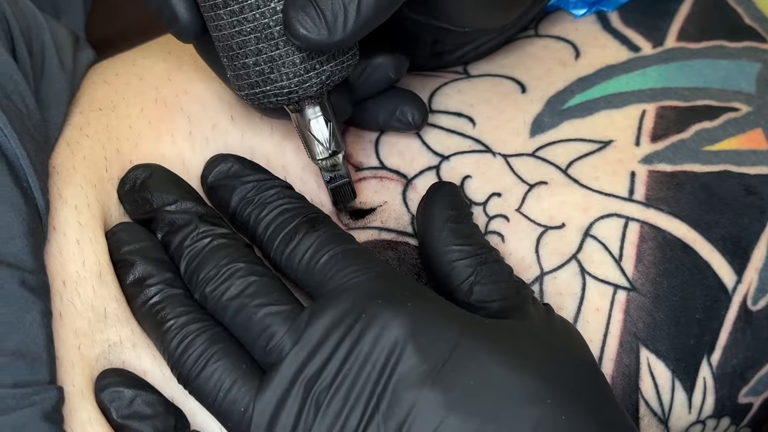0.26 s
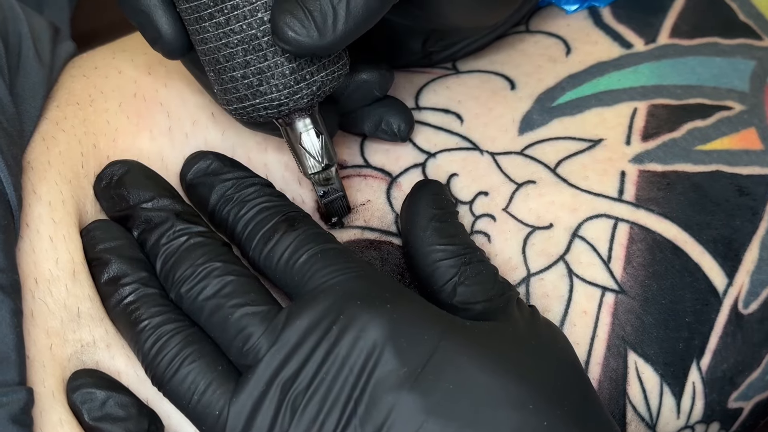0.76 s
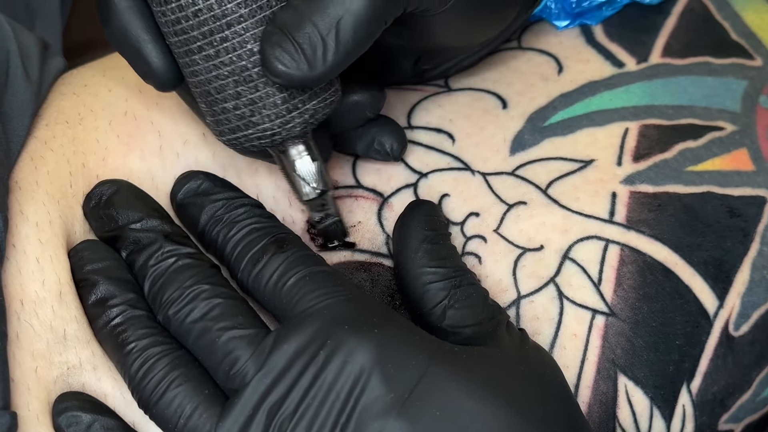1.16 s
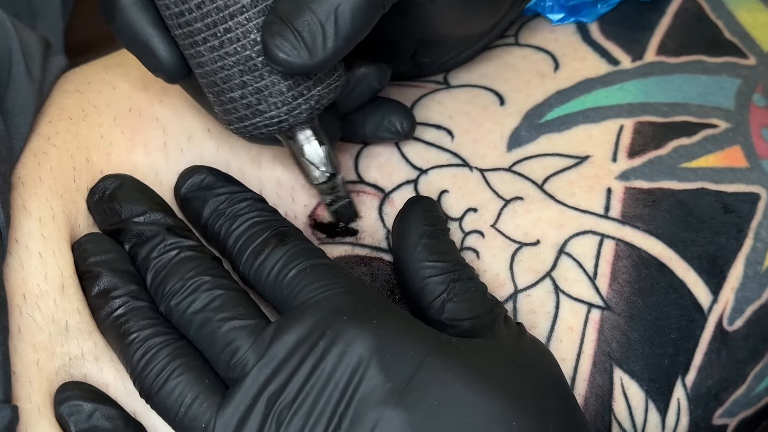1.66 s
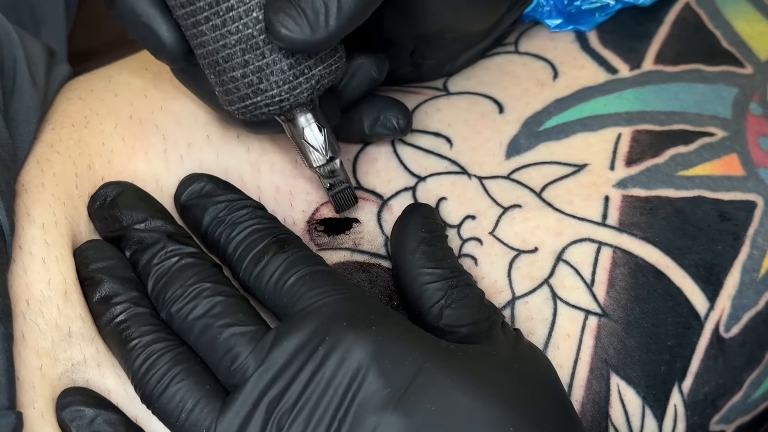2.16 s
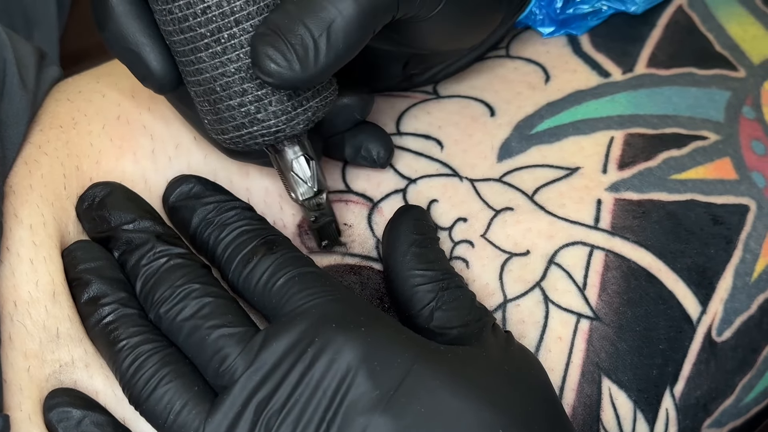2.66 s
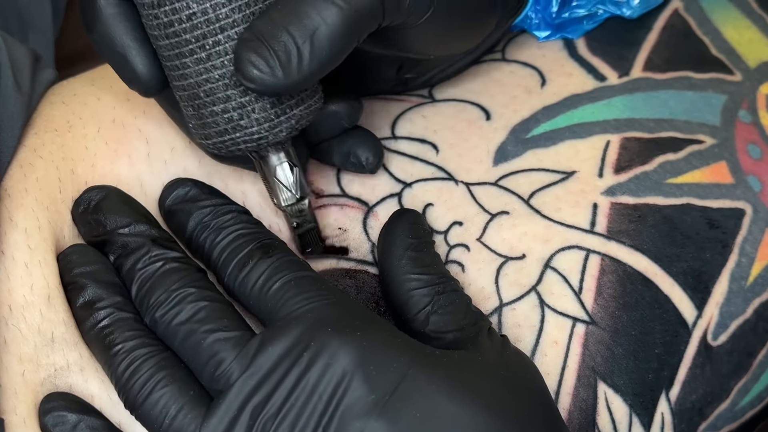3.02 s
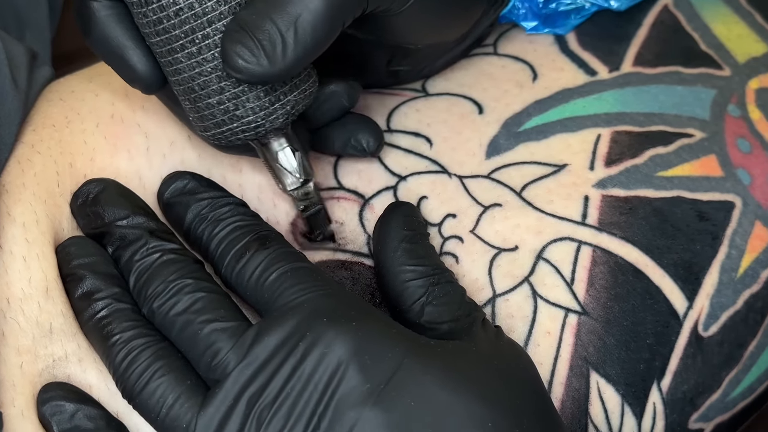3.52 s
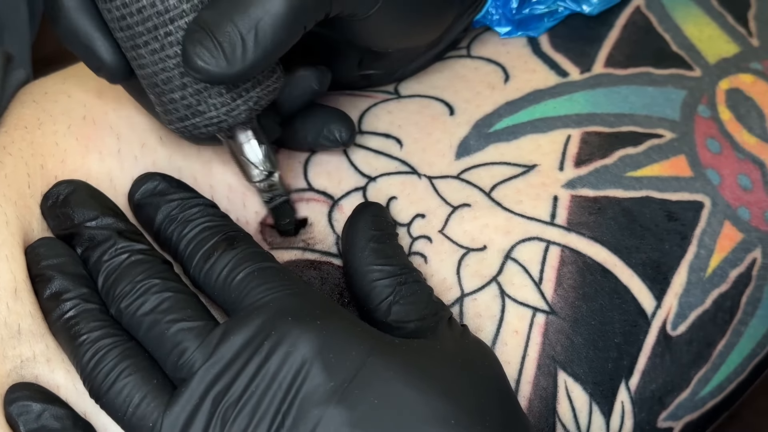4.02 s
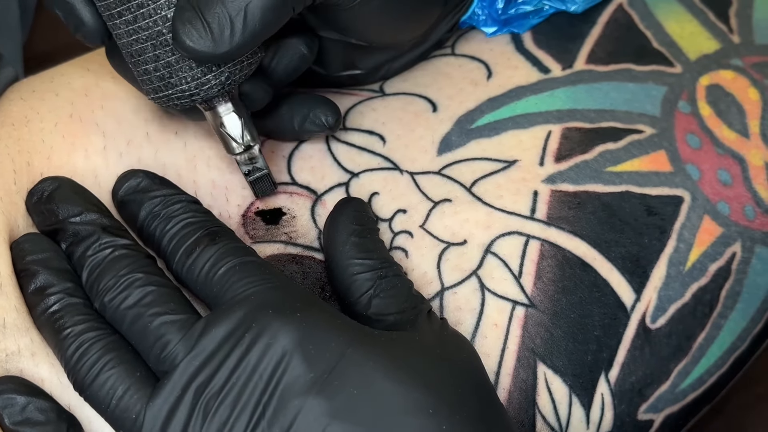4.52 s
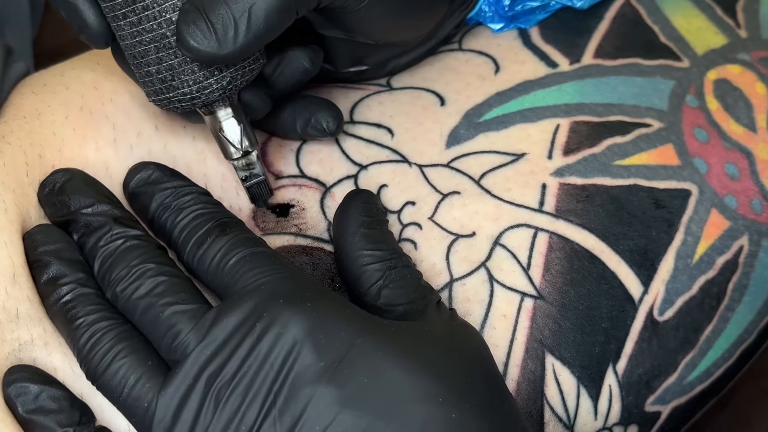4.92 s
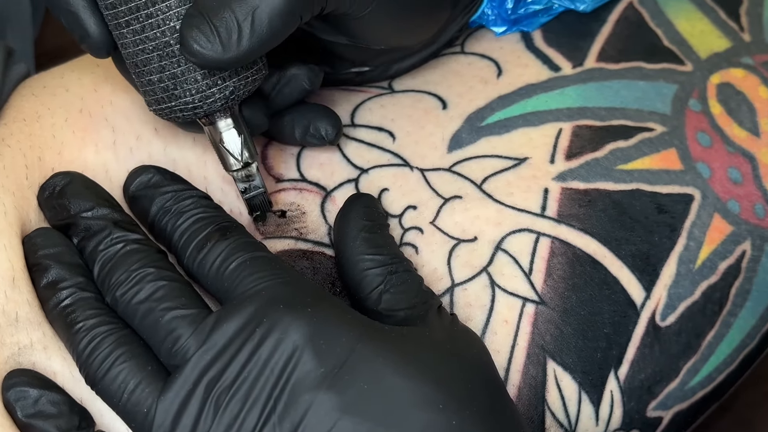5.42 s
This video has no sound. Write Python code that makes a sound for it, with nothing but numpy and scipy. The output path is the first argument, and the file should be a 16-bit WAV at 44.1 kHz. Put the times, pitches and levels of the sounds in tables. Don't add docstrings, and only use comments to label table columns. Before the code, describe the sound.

Close, thin electric buzzing of a tattoo pen, rattly and even, with two brief lifts where the motor runs slightly faster.

```python
import sys
import numpy as np
from scipy import signal
from scipy.fft import rfft, irfft, next_fast_len
from scipy.io import wavfile
from scipy.ndimage import uniform_filter1d, map_coordinates

SR = 44100
rng = np.random.default_rng(int(sys.argv[2]) if len(sys.argv) > 2 else 0)


def field_ratio(decibels):
    return 10 ** (np.asarray(decibels, dtype=float) / 20)


def file_out(sig):
    cols = np.atleast_2d(sig).T
    lim = np.clip(cols, -1, 1)
    pcm = np.round(lim * 32767).astype(np.int16)
    wavfile.write(sys.argv[1], SR, pcm)


N = 250564

# hz, level_db per Hz
RUMBLE_COLOUR = [(25, -12), (45, -2.5), (100, -2), (190, 3), (320, -2), (450, -6.5), (900, -3.5),
                 (2000, -24)]
# hz, left_right_difference_db
RUMBLE_WIDTH = [(30, -27), (80, -36), (150, -52), (300, -5.5), (2000, -3.5)]
# hz, level_db (rms)
FAN_LINES = [
    (88.5, -58),
    (110, -78),
    (165, -68.5),
    (220, -70.5),
]
# start_s, peak_db
GRIP_TICKS = [
    (1.1694, -45),
    (1.9394, -44),
    (2.5935, -37),
    (2.9716, -36),
]
# pitch_hz, level_db (rms)
SUPPLY_WHISTLES = [
    (5975, -55),
    (5708, -59),
]

# down_s, up_s, touch_down_slowing_hz, further_slowing_hz_per_s
SKIN_PASSES = [
    (-.2, 2.081, .71, .85),
    (2.444, 4.155, 1.71, .58),
    (4.603, 5.9, 1.26, .52),
]
PASS_BUZZ = (0, -0.3, 2.2)
PASS_DEPTH = (1, 1, .4)
# centre_s, slowing_hz
CIRCLING_STROKES = [(0.07, 0.51), (0.24, 1.14), (0.46, 0.71), (0.71, 0.76), (0.89, 0.42), (1.06, 0.94),
                    (1.25, 1.06), (1.45, 1.16), (1.64, 0.83), (1.84, 0.92), (2.04, 1.11), (2.33, 0.2),
                    (2.48, 0.41), (2.67, 0.73), (2.9, 1.11), (3.1, 1.11), (3.33, 0.98), (3.53, 1.0),
                    (3.74, 1.09), (3.97, 1.18), (4.6, 0.33), (4.85, 0.48), (5.01, 0.43), (5.28, 0.38),
                    (5.55, 0.27)]
# time_s, level_db
GRIP_FREEDOM = [
    (0, -2),
    (.9, 0),
    (2.9, -0.3),
    (3.3, -1.8),
    (4.04, -1.5),
    (4.13, 2.5),
    (4.24, -1.5),
    (5.12, -4.5),
    (5.68, -1.5),
]

# speed_multiple, level_db
SKIN_TONES = [(1, -3), (2, -4), (3, -6), (4, -19), (5, -19), (6, -18), (7, -14), (8, -11), (9, -1),
              (10, -5.5), (11, -7), (12, -19), (13, -20), (14, -16), (15, -5), (16, -14), (17, -3),
              (18, -9), (19, -6), (20, 8.5), (21, 1), (22, -3.5), (23, -4), (24, -5), (25, -7), (26, -9),
              (27, -4), (28, -8), (29, -2), (30, -11), (31, -3), (32, -12)]
# speed_multiple, level_db
AIR_TONES = [(1, -8), (2, -6), (3, -8), (4, -16), (5, -16), (6, -15), (7, -17), (8, -10), (9, -5.5),
             (10, -11), (11, -9), (12, -18), (13, -14), (14, -15), (15, -7), (16, -12), (17, -1), (18, -15),
             (19, -13), (20, -4), (21, -6), (22, -1.5), (23, 2.5), (24, -8), (25, -17), (26, -6), (27, -12),
             (28, -11), (29, -4), (30, -8), (31, -8.5), (32, -16)]
# place (turns, 0-1), length (turns), pitch_hz, width_hz, skin_level_db, air_level_db
HOUSING_KNOCKS = [(.95, 0.051, 3170, 440, -44.3, -49), (.25, 0.2, 3680, 600, -62, -46.5),
                  (.42, 0.17, 5870, 770, -47.5, -46), (0.08, 0.069, 5230, 560, -45, -47),
                  (0.7, 0.053, 8100, 510, -63, -49.5), (.57, .07, 9130, 470, -52, -47.5),
                  (0, 0.17, 10700, 2700, -55.5, -52), (.6, .25, 4080, 500, -64, -44.5),
                  (0.05, 0.11, 14400, 1300, -62, -57)]
# place (turns), length (turns), pitch_hz, width_hz, return_stroke_db
SHELL = (-0.5, 9, 4548, 416, -0.5)
# place (turns), length (turns), speed_multiple, width_hz
WHINE_BAND = (1.08, 0.098, 88.5, 440)
# hz, level_db per Hz
RATTLE_COLOUR = [(500, -14.5), (1000, -12.5), (1600, 5), (2500, 0.5), (3050, -1.5), (3600, -1.5), (5200, 2),
                 (6500, 3.5), (7600, 4), (8400, -2), (10500, 2.5), (12800, -3), (15500, -1.5), (17000, -1)]
# hz, left_lead_rad
PORT_LEAD = [(1150, .5), (1300, -.3), (1550, 2.1), (1850, .1), (2900, .9), (3300, .8), (3600, .05),
             (6100, .1), (6900, .9), (7450, 3.14), (8400, 6.28), (10500, 3.45), (11900, 2.75), (14100, .05)]
# hz, left_minus_right_db
PORT_LEVEL = [(400, -.4), (700, 1.8), (1200, 2), (1550, -7), (1900, -3), (2300, .1)]
# hz, level_db
SCATTERED = [(60, -26), (300, -16), (700, -13), (1400, -6), (3000, -12), (5000, -22), (8000, -14),
             (11000, -15), (14500, -16), (15700, -9)]

IDLE_HZ = 79
FREE_HZ, LOAD_DROP_HZ = 78.8, 1.4
LANDING_S, LIFT_S, STROKE_S = .026, .022, .047
TONES_DB, BUZZ_ORDERS = -51.5, (20, 31)
BUZZ_DB_PER_HZ, BUZZ_LEAD_S = 2, .06
STRAIN_ORDERS, STRAIN_DB = (22, 25), 4.5
STRAIN_FROM_HZ, STRAIN_FULL_HZ = 1.6, 2.0
RING_DB, RING_DB_PER_HZ, RING_LAG_S = -38.5, 1.8, .03
WHINE_DB, WHINE_DB_PER_HZ = -44, -5.5
WHINE_FOLLOWS_GRIP, WHINE_IN_AIR_DB = .33, 1.5
EARLY_WHINE_DB, WHINE_SETTLES_S, SETTLING_S = 7.5, 1.3, .3
RATTLE_DB, RATTLE_FOLLOWS_GRIP = -33, .075
BLOW_JITTER, BLOW_SCATTER_DB = .0005, 1.2
MOST_TURNS = 600


def rms_one(x):
    return x / np.sqrt(np.mean(x ** 2) + 1e-20)


def at_hz(points, hz):
    curve_hz, value = np.transpose(points)
    return np.interp(np.log(hz), np.log(curve_hz), value)


def drift(rate_hz):
    pole = np.exp(-80 * np.pi * rate_hz / SR)
    noise = rng.standard_normal(N // 40 + 2002)
    slow = signal.lfilter([1], [1, -2 * pole, pole * pole], noise)[2000:]
    return np.interp(np.arange(N) / 40, np.arange(len(slow)), rms_one(slow - slow.mean()))


def filtered(x, response):
    size = next_fast_len(N + 4096)
    hz = np.maximum(np.arange(size // 2 + 1) * SR / size, 1)
    return irfft(rfft(x, size) * response(hz), size)[..., :N]


def coloured(x, curve):
    return filtered(x, lambda hz: field_ratio(at_hz(curve, hz)))


def band(x, hz, width_hz):
    edges = [hz - width_hz / 2, hz + width_hz / 2]
    return rms_one(signal.sosfilt(signal.butter(2, edges, "band", fs=SR, output="sos"), x))


def once_a_turn(turns, place, length, depth_db, scatter_db):
    shifted = turns - place + .5
    strengths = field_ratio(scatter_db * rng.standard_normal(MOST_TURNS))
    strength = strengths[shifted.astype(int) + 1]
    swell = np.exp(-.5 * ((shifted % 1 - .5) / length) ** 2)
    return rms_one(1 + field_ratio(depth_db) * strength * swell)


def impacts(turns, place, jitter, scatter_db):
    timing, force = rng.standard_normal((2, MOST_TURNS))
    due = np.arange(MOST_TURNS) + place + jitter * timing
    inside = (due > 0) & (due < turns[-1])
    clicks = np.full(N, 1e-18)
    clicks[np.searchsorted(turns, due[inside])] = field_ratio(scatter_db * force[inside])
    return clicks


def struck(blows, gate, hz, width_hz, share):
    ring = band(blows, hz, width_hz)
    scrape = band(gate * rng.standard_normal(N), hz, width_hz)
    return np.sqrt(share) * ring + np.sqrt(1 - share) * scrape


def surface(turns):
    multiple = np.arange(281)
    spectrum = np.exp(2j * np.pi * rng.random(281)) * (multiple > len(SKIN_TONES))
    track = irfft(spectrum, 560)
    return rms_one(map_coordinates(track, [turns % 1 * 560], order=3, mode="grid-wrap"))


def blend(repeating, share):
    return np.sqrt(share) * repeating + np.sqrt(1 - share) * rng.standard_normal(N)


def studio():
    air = coloured(rng.standard_normal((2, N)), RUMBLE_COLOUR)
    middle, width = field_ratio(-51.5) * rms_one(air)
    width = coloured(width, RUMBLE_WIDTH)
    t = np.arange(N) / SR
    lines = np.zeros(N)
    for hz, level_db in FAN_LINES:
        level = field_ratio(level_db + 2.0 * drift(.63))
        lines += level * np.sin(2 * np.pi * hz * t + .66 * drift(2.8))
    return middle + np.sqrt(2) * lines + width * [[1], [-1]]


def ticks():
    clicks = np.zeros(N)
    decay = np.exp(-np.arange(200) / 30)
    for start_s, peak_db in GRIP_TICKS:
        start = round(start_s * SR)
        clicks[start:start + 200] = field_ratio(peak_db + 16) * rng.standard_normal(200) * decay
    return coloured(clicks, [(1500, -18), (5500, -11), (9000, -3), (12000, -3), (16000, -8)])


def whistles():
    t = np.arange(N) / SR
    lines = np.zeros(N)
    for hz, level_db in SUPPLY_WHISTLES:
        level = field_ratio(level_db + 2.4 * drift(1.5))
        lines += level * np.sin(2 * np.pi * hz * t + .6 * drift(5.9))
    fade_in = np.clip((t - 2.68) / .05, 0, 1)
    return np.sqrt(2) * fade_in * lines


def touching():
    t = np.arange(N) / SR
    contact, leaning_hz = [], np.zeros(N)
    for down_s, up_s, slow_hz, sag_hz_per_s in SKIN_PASSES:
        landed = 1 + np.tanh((t - down_s) / LANDING_S)
        not_lifted = 1 - np.tanh((t - up_s) / LIFT_S)
        contact.append(landed * not_lifted / 4)
        leaning_hz += contact[-1] * (slow_hz + sag_hz_per_s * (t - down_s))
    return np.array(contact), leaning_hz


def digging(lag_s=0):
    t = np.arange(0, N + 100, 100) / SR
    slowing_hz = sum(slow_hz * np.exp(-.5 * ((t - s) / STROKE_S) ** 2) for s, slow_hz in CIRCLING_STROKES)
    return np.interp(np.arange(N) / SR - lag_s, t, slowing_hz)


def rattle(turns, track, rattle_db):
    throb = 1 + .029 * np.cos(4 * np.pi * turns)
    rolling = coloured(throb * blend(track, share=.7), RATTLE_COLOUR)
    steady_db = uniform_filter1d(rattle_db, size=SR // 2)
    return field_ratio(steady_db) * rms_one(rolling)


def whine(turns, track, whine_db):
    place, length, multiple, width_hz = WHINE_BAND
    low = signal.butter(2, width_hz / 2, fs=SR, output="sos")
    carrier = np.exp(2j * np.pi * round(multiple * 2) / 2 * turns)
    gate = once_a_turn(turns, place, length, depth_db=11.5, scatter_db=5)
    source = gate * blend(track, share=.65)
    narrow = signal.sosfilt(low, source / carrier) * carrier
    return field_ratio(whine_db) * rms_one(narrow.real)


def housing(turns, ring_db):
    place, length, hz, width_hz, return_db = SHELL
    gate = once_a_turn(turns, place, length, depth_db=-39.0, scatter_db=-4.0)
    outward = impacts(turns, place, BLOW_JITTER, 2 * BLOW_SCATTER_DB)
    returning = impacts(turns, place + .5, BLOW_JITTER, BLOW_SCATTER_DB)
    blows = outward + field_ratio(return_db) * returning
    return field_ratio(ring_db) * struck(blows, gate, hz, width_hz, share=.6)


def knocks(turns, load):
    out = np.zeros(N)
    for place, length, hz, width_hz, skin_db, air_db in HOUSING_KNOCKS:
        gate = once_a_turn(turns, place, length, depth_db=8.5, scatter_db=1.0)
        blows = impacts(turns, place, BLOW_JITTER, BLOW_SCATTER_DB)
        level_db = load * skin_db + (1 - load) * air_db + .8 * drift(3)
        out += field_ratio(level_db) * struck(blows, gate, hz, width_hz, share=.8)
    return out


def cam_tones(turns, load, buzz_db, depth, strain):
    out = np.zeros(N)
    buzz_change_db = buzz_db - np.mean(buzz_db)
    for (k, skin_db), (_, air_db) in zip(SKIN_TONES, AIR_TONES):
        held = load
        if BUZZ_ORDERS[0] <= round(k) <= BUZZ_ORDERS[1]:
            held = load * depth
            skin_db = skin_db + buzz_change_db
        if STRAIN_ORDERS[0] <= k <= STRAIN_ORDERS[1]:
            skin_db = skin_db + STRAIN_DB * strain
        level_db = held * skin_db + (1 - held) * air_db + 1.07 * drift(5.9)
        slip_rad = rng.normal(0, .8) + .008 * k * drift(14)
        out += field_ratio(level_db) * np.cos(2 * np.pi * round(k) * (turns - .82) + slip_rad)
    return field_ratio(TONES_DB) * np.sqrt(2) * out


def port(x, sign):
    scatter = rng.standard_normal(16000) * np.exp(-np.arange(16000) / 4000)
    echo = rfft(scatter / np.sqrt(np.sum(scatter ** 2)), next_fast_len(N + 4096))

    def response(hz):
        level = field_ratio(sign * at_hz(PORT_LEVEL, hz) / 2)
        direct = level * np.exp(.5j * sign * at_hz(PORT_LEAD, hz))
        return direct + field_ratio(at_hz(SCATTERED, hz)) * echo
    return filtered(x, response)


def scene():
    t = np.arange(N) / SR
    contact, leaning_hz = touching()
    dug_hz = digging()
    speed_hz = IDLE_HZ - leaning_hz - dug_hz
    turns = np.cumsum(speed_hz) / SR
    load = np.clip((FREE_HZ - speed_hz) / LOAD_DROP_HZ, 0, 1)
    strain = np.clip((leaning_hz - STRAIN_FROM_HZ) / (STRAIN_FULL_HZ - STRAIN_FROM_HZ), 0, 1)
    depth = np.dot(PASS_DEPTH, contact)
    track = surface(turns + .0005 * drift(32))

    grip_db = np.interp(t, *np.transpose(GRIP_FREEDOM))
    buzz_db = np.dot(PASS_BUZZ, contact) + BUZZ_DB_PER_HZ * digging(-BUZZ_LEAD_S)
    ring_db = RING_DB + grip_db + RING_DB_PER_HZ * digging(RING_LAG_S)
    early = (1 - np.tanh((t - WHINE_SETTLES_S) / SETTLING_S)) / 2
    in_air = 1 - contact.sum(axis=0)
    whine_db = WHINE_DB + WHINE_FOLLOWS_GRIP * grip_db + WHINE_DB_PER_HZ * dug_hz
    whine_db = whine_db + EARLY_WHINE_DB * early + WHINE_IN_AIR_DB * in_air
    rattle_db = RATTLE_DB + RATTLE_FOLLOWS_GRIP * grip_db

    machine = rattle(turns, track, rattle_db) + whine(turns, track, whine_db)
    machine = machine + housing(turns, ring_db) + knocks(turns, load)
    machine = machine + cam_tones(turns, load, buzz_db, depth, strain)
    close = machine + whistles()
    at_ports = np.array([port(close, .97), port(close, -1.02)])
    return studio() + ticks() * field_ratio([[2.5], [-2.5]]) + at_ports


def roll_off(x):
    return signal.sosfilt(signal.butter(12, 16990, fs=SR, output="sos"), x)


def record(dry):
    return roll_off(dry)


dry = scene()
out = record(dry)
file_out(out)
```